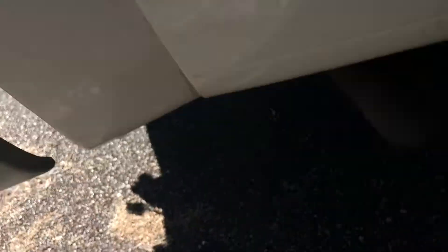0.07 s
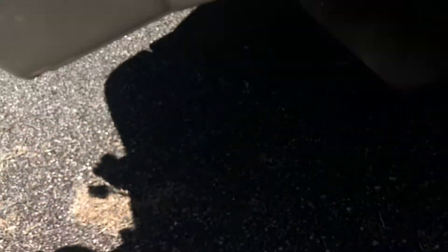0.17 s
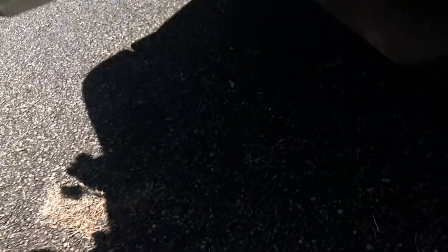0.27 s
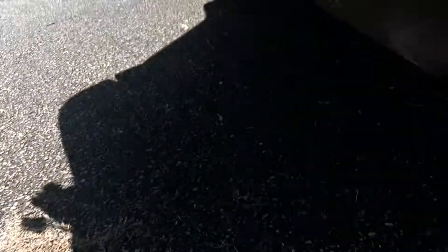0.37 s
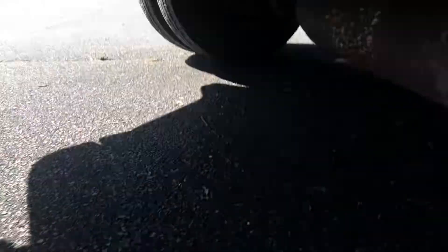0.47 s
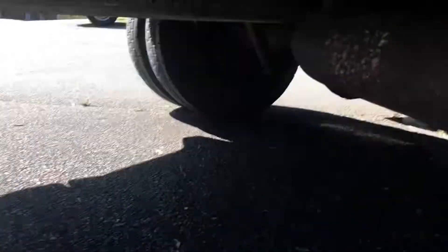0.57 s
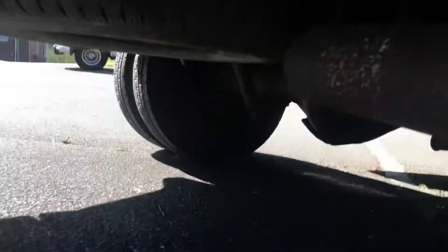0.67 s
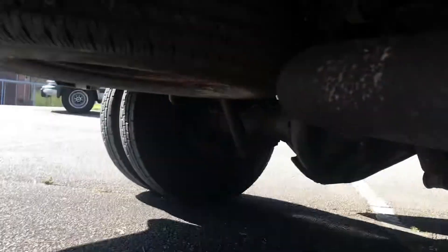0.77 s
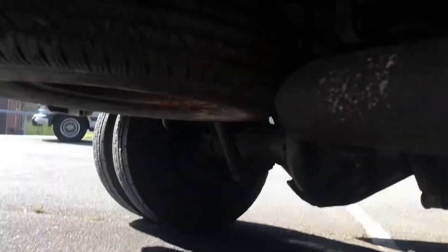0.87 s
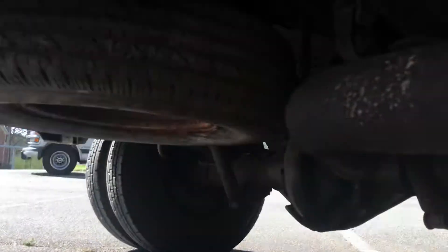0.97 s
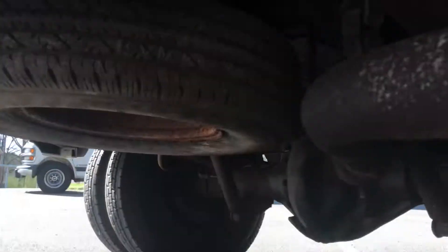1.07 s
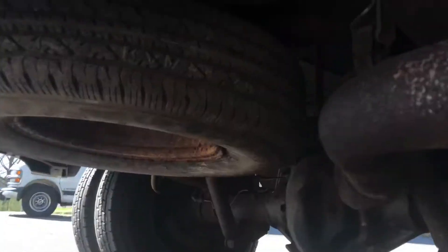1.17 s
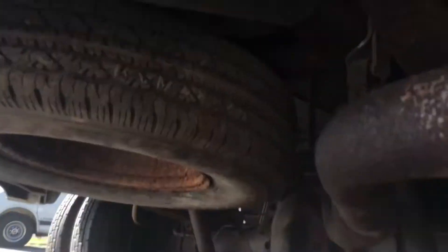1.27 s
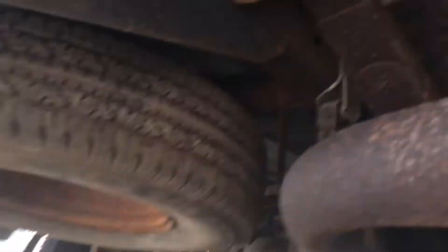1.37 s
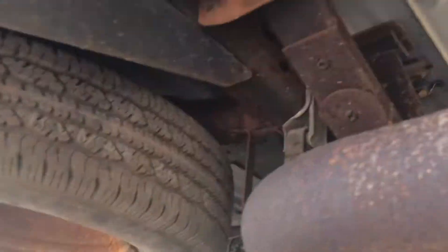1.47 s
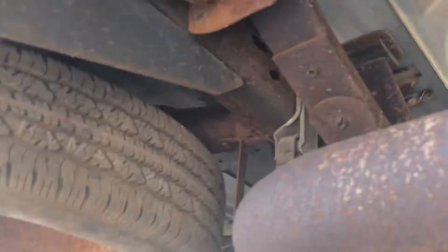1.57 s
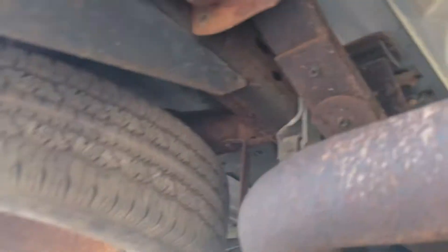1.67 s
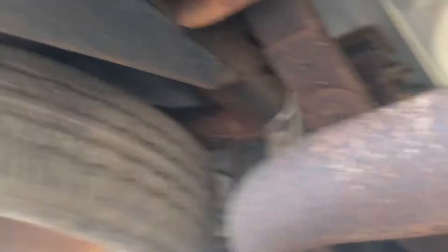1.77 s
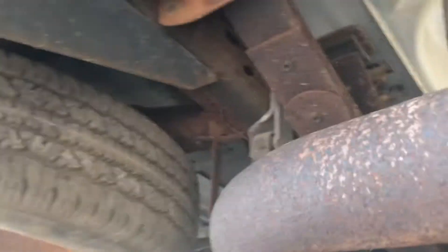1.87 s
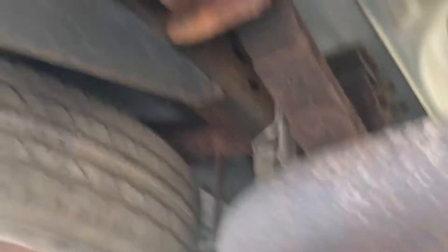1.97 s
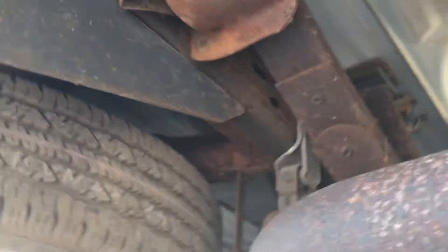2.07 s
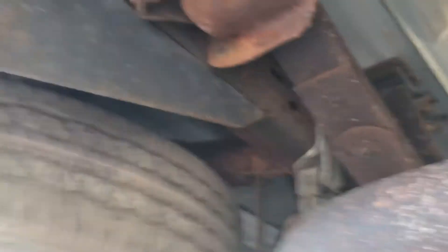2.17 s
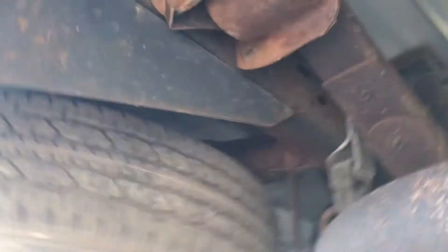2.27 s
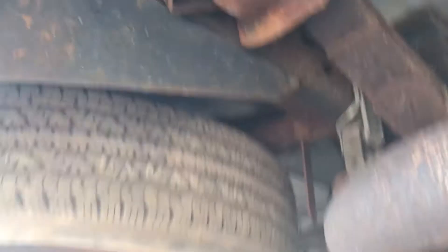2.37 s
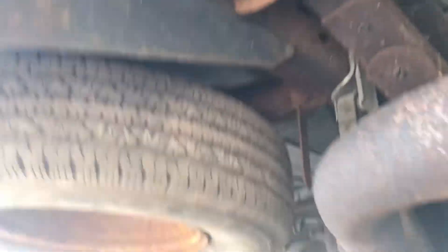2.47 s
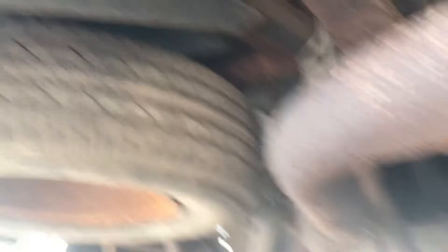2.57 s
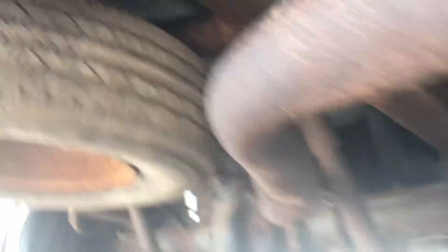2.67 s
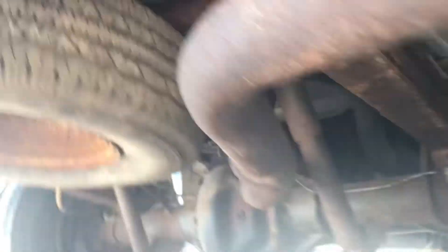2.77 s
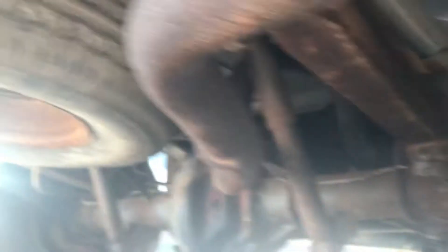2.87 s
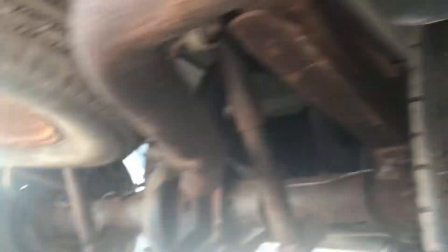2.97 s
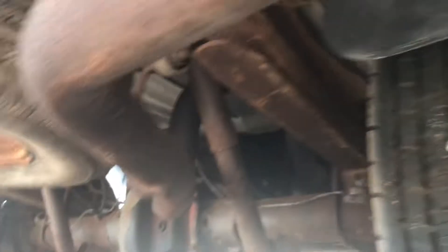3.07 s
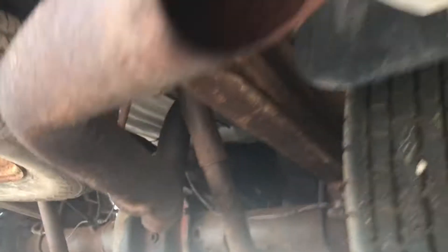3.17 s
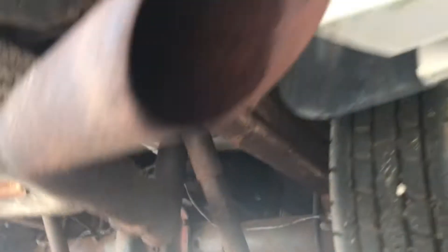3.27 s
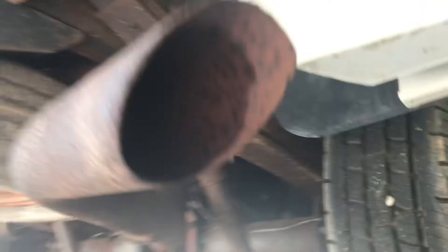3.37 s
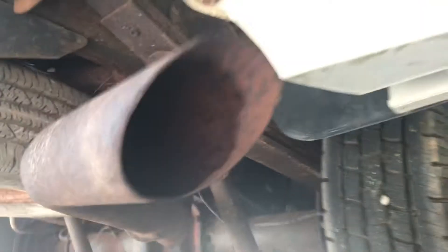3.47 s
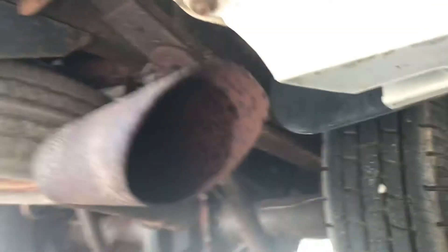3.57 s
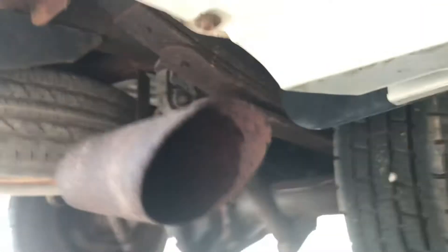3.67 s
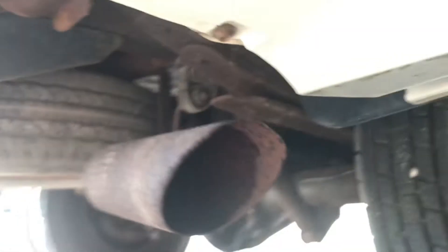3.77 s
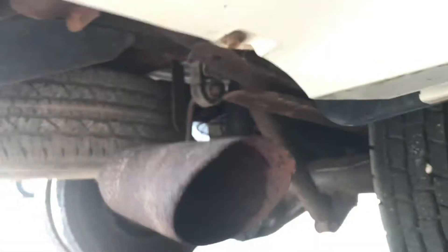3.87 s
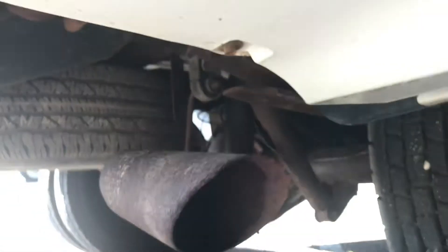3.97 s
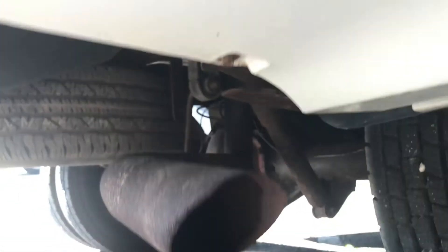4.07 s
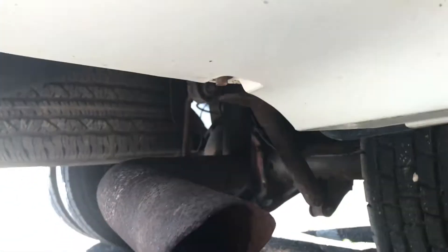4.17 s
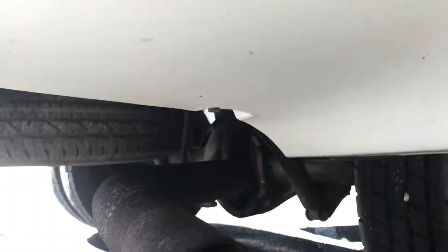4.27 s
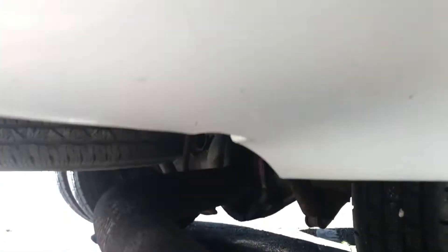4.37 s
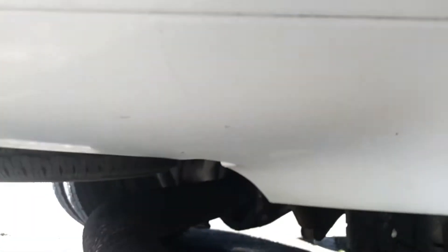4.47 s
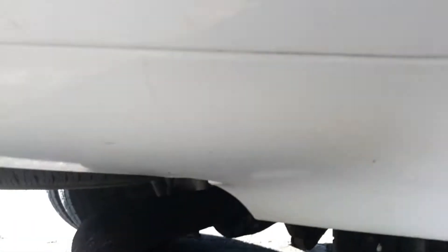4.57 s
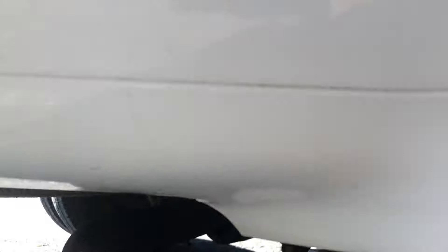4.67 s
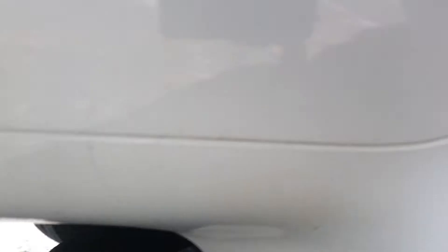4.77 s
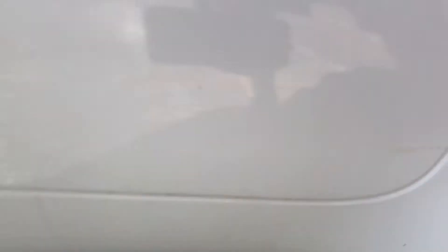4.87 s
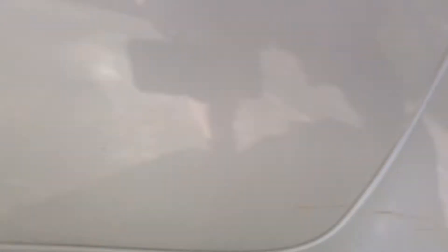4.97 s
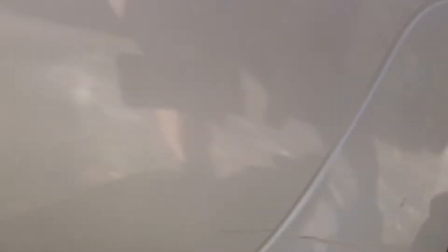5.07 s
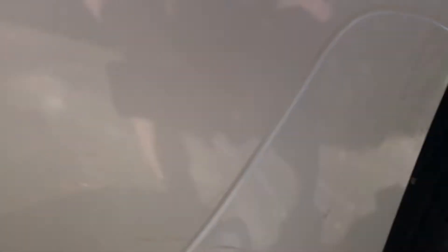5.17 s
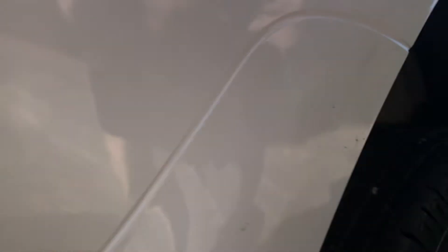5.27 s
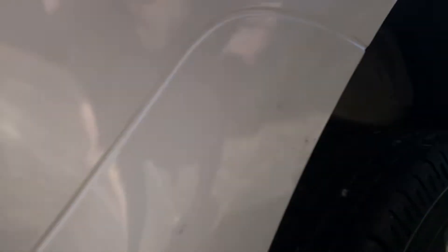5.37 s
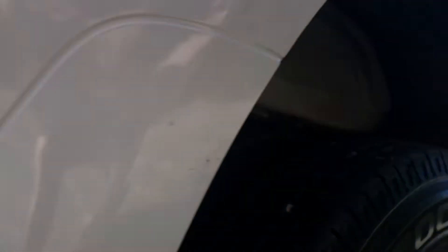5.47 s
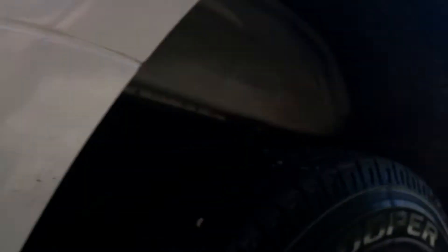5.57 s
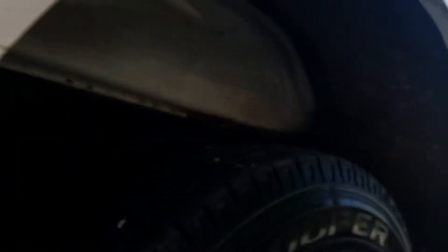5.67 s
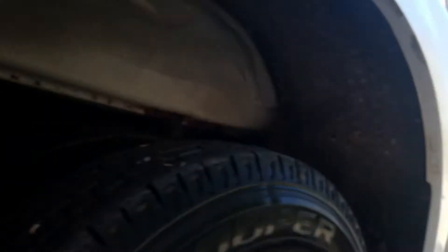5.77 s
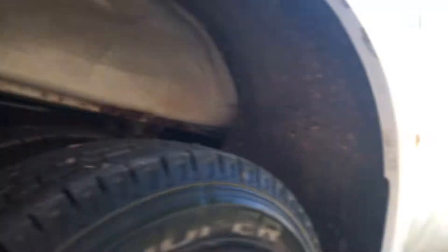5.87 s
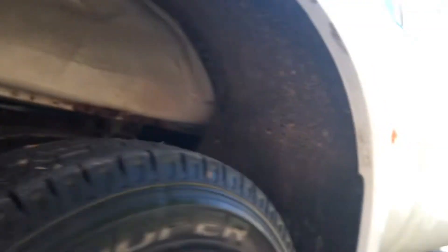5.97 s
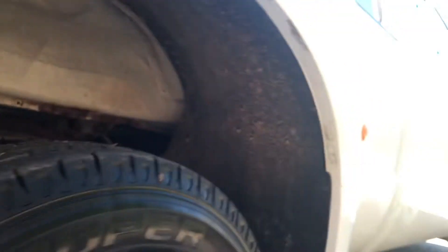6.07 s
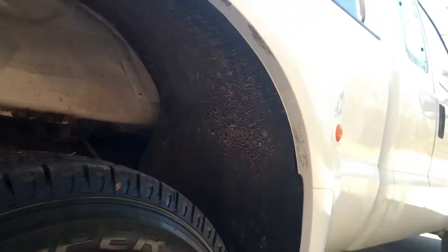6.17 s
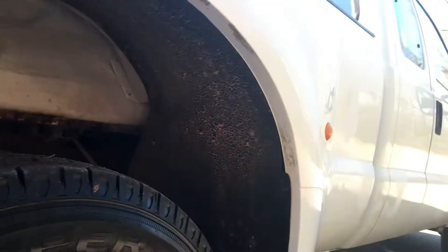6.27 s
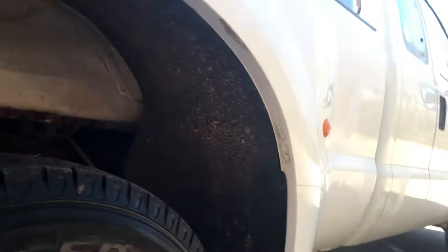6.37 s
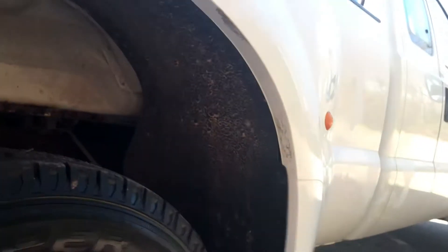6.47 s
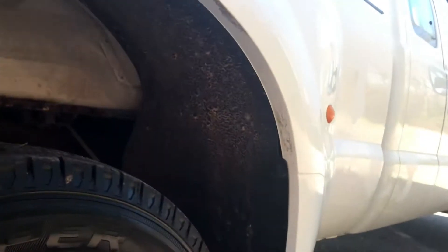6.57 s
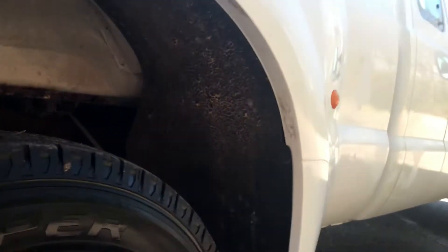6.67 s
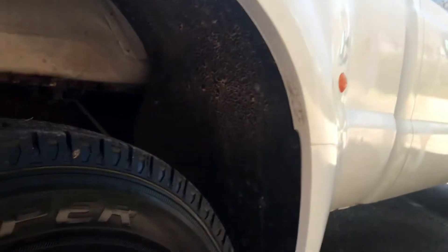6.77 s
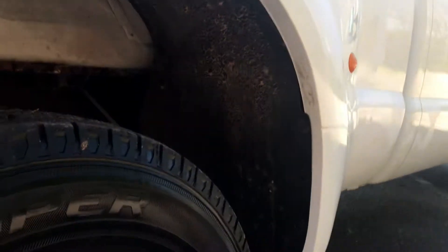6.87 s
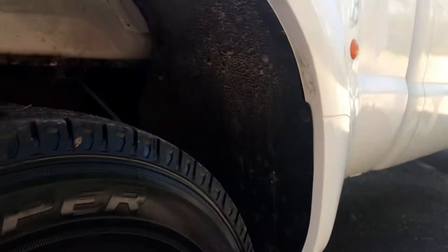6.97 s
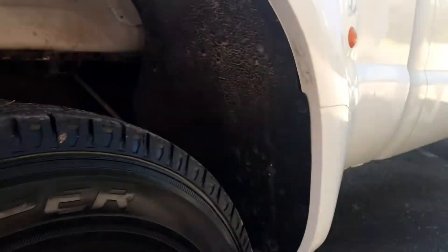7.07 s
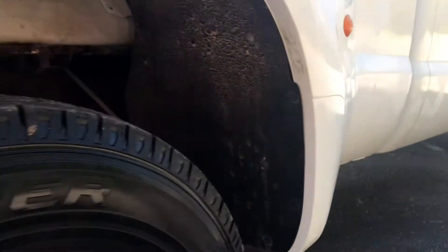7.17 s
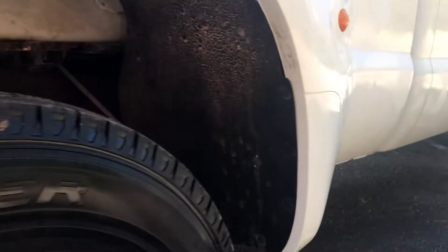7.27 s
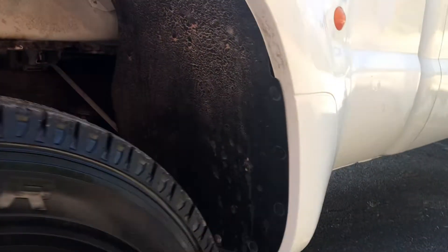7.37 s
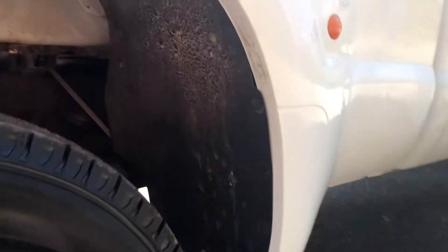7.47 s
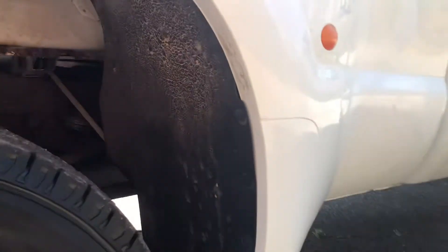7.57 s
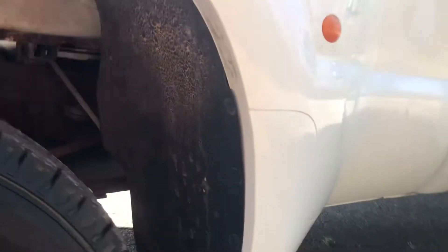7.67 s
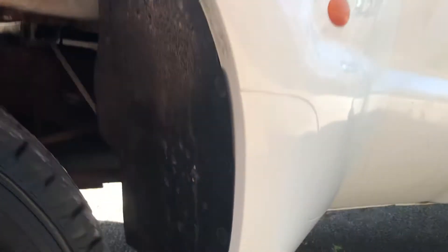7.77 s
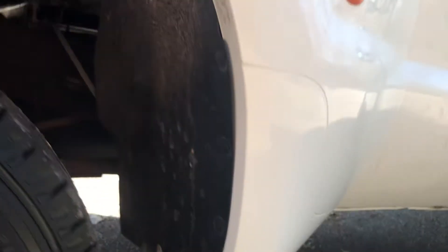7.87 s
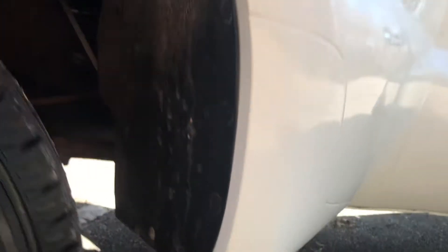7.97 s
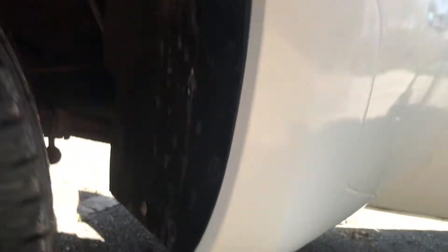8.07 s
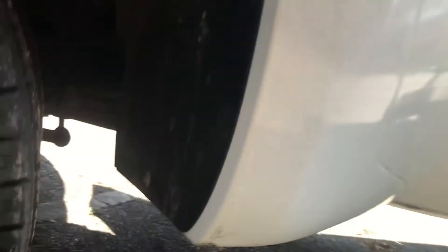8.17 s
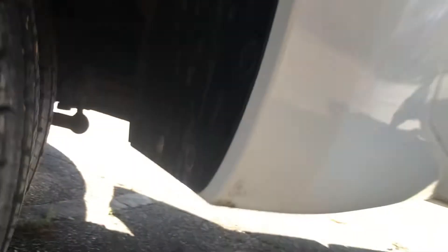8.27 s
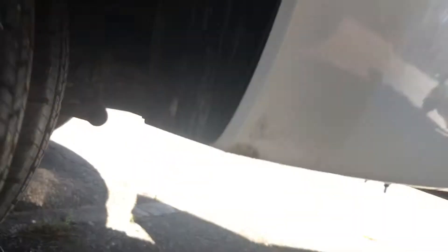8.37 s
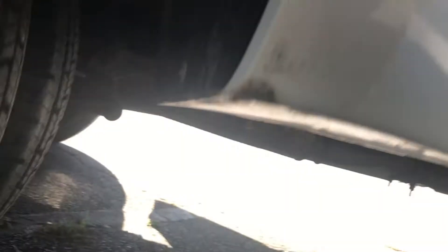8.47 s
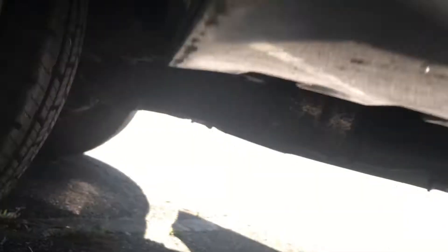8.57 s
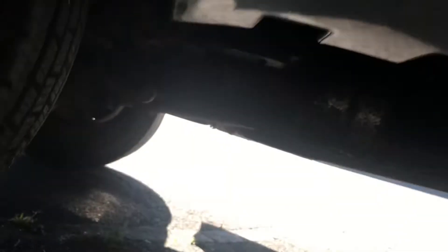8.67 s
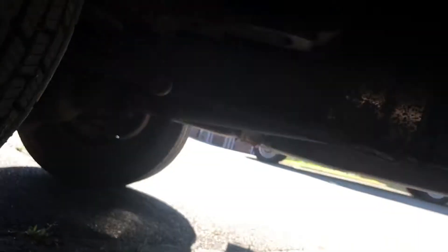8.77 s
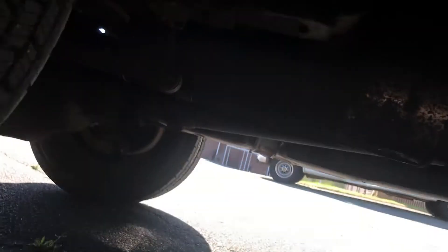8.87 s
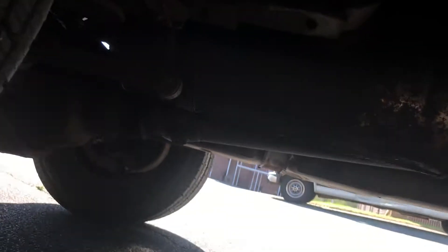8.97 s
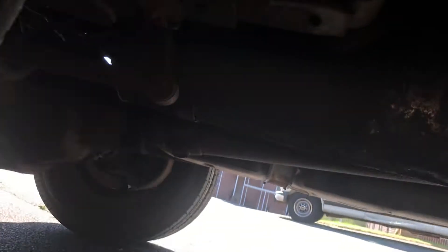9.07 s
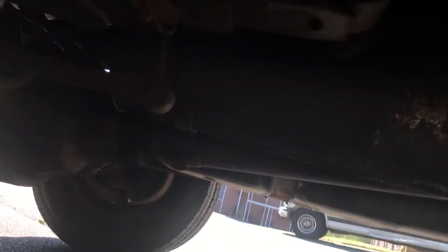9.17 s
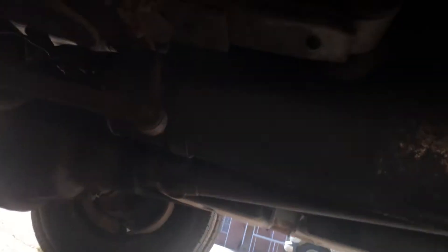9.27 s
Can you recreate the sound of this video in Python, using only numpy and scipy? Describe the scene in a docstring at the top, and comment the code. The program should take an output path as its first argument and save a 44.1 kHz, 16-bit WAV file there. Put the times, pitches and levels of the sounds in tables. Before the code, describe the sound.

Steady low idle of a large truck, heard close from a moving microphone on asphalt. The exhaust throbs unevenly, with occasional soft thumps, swelling near the pipe mouth and fading at the wheel arch. There, midrange mechanical clatter and fine valve hiss grow clearer. Light grit ticks come first, then a sharp shoe scrape with dull heel knocks halfway, sparse finger clicks, and finally a softer scuff with rapid ticks.

```python
"""A ten-cylinder petrol truck engine idles outdoors: its firing tone and octave are sines locked to the camshaft,
uneven burns ring the exhaust pipe modes, and shaped noise makes the gas rush, engine bay and valve hiss.
The microphone starts under the load bed, passes the tailpipe mouth and ends by the wheel arch and sill, where the
exhaust is fainter and the engine bay louder. Shoes scuff on gritty asphalt: enveloped grainy noise, with short
dying cracks for ticks and heel knocks."""
import sys
import numpy as np
from scipy import signal
from scipy.fft import rfft, irfft, next_fast_len
from scipy.io import wavfile
from scipy.ndimage import uniform_filter1d, map_coordinates

SR = 44100
rng = np.random.default_rng(int(sys.argv[2]) if len(sys.argv) > 2 else 0)


def unload_audio(sound):
    """Save the sound as a 16-bit wav file, at the path given as the first command line argument."""
    columns = np.transpose(np.atleast_2d(sound))
    # keep every value between -1 and 1, then stretch to whole-number steps
    steps = np.round(np.clip(columns, -1, 1) * 32767)
    wavfile.write(sys.argv[1], SR, steps.astype(np.int16))


def natural_amplitude(level_db):
    """Convert a level in decibels to a linear amplitude factor, elementwise."""
    exponent = np.asarray(level_db, float) / 20
    return 10 ** exponent


N = 411012  # samples

# microphone walk: time_s, place (0 under the bed, 1 tailpipe, 2 wheel arch, 3 low beside the sill),
# firing_tone_db, detour_m of the sound reflected by ground and body, engine_bay_db
WALK = [(0, -0.14, -27, 0.21, -52), (.35, 0.7, -26, 0.28, -52), (.8, 0.22, -24.5, .3, -50.5),
        (1.5, -0.07, -24, 0.24, -49.5), (2.4, 0, -24, 0.23, -50), (2.85, 0, -23, .2, -49.5),
        (3.2, 0.64, -21, 0.19, -50.5), (3.5, 1, -22, 0.42, -53), (3.9, 1, -22.5, .42, -54),
        (4.2, 1, -24.5, 0.59, -54), (4.75, 1, -25.5, .72, -54), (5.2, 1, -27.5, 0.52, -55),
        (5.6, 1.95, -30.5, 0.56, -52), (6.0, 2.5, -33, 0.48, -50.5), (6.6, 2, -33, 0.38, -48.5),
        (7.2, 2.5, -32.5, 0.46, -49), (7.6, 2.5, -34, 0.43, -47), (8.2, 3, -34, 0.16, -47),
        (8.8, 3, -33, 0.32, -46), (9.32, 3, -31, 0.23, -46)]
# exhaust against the firing tone, one row per place: octave_db, uneven_firings_db, third_mode_db, fourth_mode_db
EXHAUST_MIX = [(-14, -14.5, -27, -35.5), (-16, -14.5, -25, -30), (-12.5, -9, -22.5, -25.5),
               (-12, -8, -23.5, -25.5)]
# against the engine bay, one row per place: gas_rush_db, valve_gear_db
BAY_MIX = [(2.5, -16), (8.5, -14.5), (-0.5, -13.5), (2, -12.5)]
# low modes of the exhaust pipe: centre_hz, width_hz, relative_db
LOW_PIPE = [(59.7, 19.7, 1), (112, 24, -12), (153, 20, -8.5), (182, 26, -3.5), (200.8, 9.9, 1.5)]


def unit(x):
    """Scaled to rms 1."""
    return x / np.sqrt(np.mean(x ** 2) + 1e-20)


def curves(rows):
    """One value per sample for each column after the time."""
    time_s, *columns = np.transpose(rows)
    return [np.interp(np.arange(N) / SR, time_s, column) for column in columns]


def in_place(rows):
    """One value per sample for each column of a table with one row per place."""
    place = curves(WALK)[0]
    return [np.interp(place, np.arange(len(rows)), column) for column in np.transpose(rows)]


def wobble(rate_hz):
    """Smooth random curve of rms 1, rate_hz knots a second."""
    knots = rng.standard_normal(int(N * rate_hz / SR) + 4)
    return unit(map_coordinates(knots, [np.arange(N) * rate_hz / SR]))


def filtered(x, response):
    """x times a complex response of frequency."""
    m = next_fast_len(N + SR // 2)
    return irfft(rfft(x, m) * response(np.fft.rfftfreq(m, 1 / SR)), m)[..., :N]


def coloured(x, points):
    """x through (Hz, dB) points on a log frequency axis, rms 1."""
    f, db = np.transpose(points)
    return unit(filtered(x, lambda hz: natural_amplitude(np.interp(np.log(hz + 1), np.log(f + 1), db))))


def resonant(x, modes):
    """x through parallel second-order resonances (centre Hz, width Hz, dB)."""
    return filtered(x, lambda f: sum(natural_amplitude(db) * 1j * f * w / (c * c - f * f + 1j * f * w) for c, w, db in modes))


def dying_noise(samples, t60_s):
    """White noise that decays by 60 dB in t60_s."""
    return natural_amplitude(-60 * np.arange(samples) / SR / t60_s) * rng.standard_normal(samples)


def with_tail(x, t60_s, tail_db):
    """x plus a dense dying tail of itself."""
    tail = dying_noise(SR // 10, t60_s)
    return x + natural_amplitude(tail_db) * signal.fftconvolve(x, tail / np.linalg.norm(tail))[:N]


def reflection_db(hz):
    """Direct and reflected sound add or cancel, by the detour in wavelengths."""
    reflected, sound_m_per_s = 0.73, 343  # reflected amplitude against the direct sound
    turn = 2 * np.pi * hz * curves(WALK)[2] / sound_m_per_s
    return 10 * np.log10(1 + reflected ** 2 + 2 * reflected * np.cos(turn) + 1e-3)


def spells():
    """The idle pulls harder or falters: each spell is a smooth bump in the three exhaust levels."""
    # centre_s, half_length_s, firing_tone_db, uneven_firings_db, upper_modes_db
    spell_rows = [(0.196, 0.094, -3.5, 3.5, -4), (0.503, 0.15, -1, -3, 7), (0.702, 0.087, 4.5, 5, 6.5),
                  (0.827, 0.12, -0.5, 6, -5), (1.053, 0.1, 1.5, -5, -6), (1.323, 0.063, 3.5, 4.5, 2),
                  (1.55, 0.087, -3, 5, 3.5), (1.76, .12, 1, 1, 3.5), (1.9, 0.09, -2, 5, 2),
                  (2.078, 0.13, 2, -4, -4), (2.205, 0.2, -2, 2.5, 1.5), (2.53, 0.048, -4.5, 2, 4),
                  (2.666, 0.15, 0.5, 1, -1.5), (2.99, 0.084, -3, 5.5, 5), (3.12, 0.18, 2, 4.5, 3.5),
                  (3.346, 0.19, -2, 4, 6.5), (3.64, 0.15, 1.5, 0.5, 8.5), (4.09, 0.18, -0.5, 6.5, 3.5),
                  (4.264, 0.13, -1, 8.5, 11), (4.55, 0.19, -2, 8.5, 4), (4.97, 0.16, -1.5, 6, 0),
                  (5.1, 0.14, 0, 0, 7), (5.352, .1, -1, 2, -3), (5.55, 0.24, 0.5, -7.5, -11),
                  (5.99, 0.15, -0.5, -2, -10), (6.196, .1, 2, -1, 4), (6.544, 0.11, -7, 3, -1.5),
                  (7.205, 0.44, -0.5, 3.5, 6), (7.7, 0.23, -1.5, 3, 3), (7.93, 0.089, -0.5, 1, 2),
                  (8.11, .14, -0.5, 8, 5), (8.413, 0.2, 0.5, -9, 0.5), (8.658, .08, -0.5, -3, 1),
                  (8.988, 0.17, 0, -6.5, -2.5), (9.2, .12, -1.5, -1.5, -8)]
    t, out = np.arange(N) / SR, np.zeros((3, N))
    for centre_s, half_length_s, *db in spell_rows:
        bump = np.cos(np.pi / 2 * np.clip((t - centre_s) / half_length_s, -1, 1)) ** 2
        out += np.outer(db, bump)
    return out


def by_place(spectra, patchy_db, echo_db, rattle_db):
    """Patchy noise; each place has its own colour, ringing panels and echoes between chassis and ground."""
    # pipe and panels that ring most, one list per place: centre_hz, width_hz, relative_db
    panels = [
        [(598, 28, -2), (711, 12, 6), (815, 20, -10), (848, 22, 2.5), (929, 20, -2.5), (1060, 19, -4.5),
         (1570, 12, -1), (2300, 30, -4.5), (2490, 21, 0.5), (2570, 30, -7)],
        [(604, 14, -0.5), (690, 20, -0.5), (822, 20, 3.5), (850, 11, -0.5), (1222, 66, -0.5), (1450, 30, -14),
         (1670, 25, -4), (2000, 25, -6), (2423, 30, -1.5)],
        [(600, 23, -8), (654, 27, -4), (820, 15, -5), (1544, 13, 6), (1750, 20, -15), (2040, 21, -5),
         (2500, 27, -4)],
        [(555, 20, -22), (689, 38, 4), (850, 43, -6), (1546, 22, 2), (1980, 18, -10)],
    ]
    rattle = rng.standard_normal(N) * natural_amplitude(rattle_db * wobble(700))
    z = signal.stft(rattle, nperseg=1024)[2]
    field = uniform_filter1d(rng.standard_normal(z.shape), size=3, axis=0)  # across frequency
    field = uniform_filter1d(field, size=14, axis=1)  # along time
    noise = signal.istft(z * natural_amplitude(patchy_db * unit(field)), nperseg=1024)[1][:N]
    place, out = curves(WALK)[0], 0
    for k, spectrum in enumerate(spectra):
        near = with_tail(noise, 0.15, echo_db)
        share = np.clip(1 - abs(place - k), 0, 1)
        out = out + share * coloured(near + resonant(near, panels[k]), spectrum)
    return out


def camshaft():
    """Camshaft turns: ten firings make one."""
    # time_s, firing_rate_hz
    speed = [(0, 64.3), (.45, 63.1), (.9, 62), (1.5, 63.4), (2.4, 63.5), (3.3, 62.9), (3.6, 60.8),
             (3.9, 60.7), (4.2, 62), (5.1, 62.5), (6.0, 62.55), (6.3, 63.4), (7.5, 62.5), (9.0, 62.7),
             (9.32, 63.8)]
    return np.cumsum(curves(speed)[0]) / SR / 10


def tones(cam):
    """The firing tone and its octave, with weaker tones of unequal cylinders and belt-driven parts."""
    # camshaft_multiple, near_db against the octave near the exhaust, far_db the same at the wheel arch
    weak_orders = [(5.3, -5, -19), (15.2, -7.5, -5), (17.26, -8, -11.5), (18.44, -12, -1.5),
                   (22.06, -7.5, -8.5), (22.86, -12, -14), (24.98, -13.5, -6.5), (30.37, -13.5, -10.5),
                   (33.04, -10.5, -12.5), (40.4, -22.5, -22), (46.95, -28, -24), (49, -31.5, -22.5),
                   (50.1, -23, -25)]
    place, walk_db = curves(WALK)[:2]
    first_db = walk_db + spells()[0] + 0.15 * wobble(8) + 0.13 * wobble(25)
    second_db = walk_db + in_place(EXHAUST_MIX)[0] + 0.5 * reflection_db(99)
    far = np.clip(place - 1, 0, 1)
    # out from under the bed the octave lags more, and the wave leans the other way
    lag_rad = 1.0 + 1.3 * np.clip(place, 0, 1) - 0.45 * wobble(14)
    out = natural_amplitude(first_db) * np.sin(2 * np.pi * 10 * cam)
    out += natural_amplitude(second_db + 0.93 * wobble(15)) * np.sin(2 * np.pi * 20 * cam - lag_rad)
    for multiple, near_db, far_db in weak_orders:
        drift_rad = rng.uniform(0, 2 * np.pi) + 0.4 * wobble(3)
        order_db = second_db + near_db + far * (far_db - near_db) + 0.87 * wobble(3.6)
        out += natural_amplitude(order_db) * np.sin(2 * np.pi * multiple * cam + drift_rad)
    return np.sqrt(2) * out  # levels are rms


def silenced(x):
    """The silencer cuts steeply above the low pipe modes."""
    return filtered(x, lambda hz: 1 / (1 + (hz / 224) ** 14))


def uneven_burns(cam):
    """No two burns are alike: the differences, as jittered signed impulses, ring the pipe modes."""
    # how unevenly each cylinder burns: level_db
    cylinders = [5, 1.5, 2, -6, -1.5, 2, 5, 4.5, -1, 2]
    third, fourth = (305, 17, 0), (407, 30, 0)  # pipe modes: centre Hz, width Hz, dB
    walk_db, (_, rough_db, ring_db) = curves(WALK)[1], spells()
    low_db, third_db, fourth_db = walk_db + np.array(in_place(EXHAUST_MIX)[1:])
    low_db += rough_db + 0.8 * wobble(14)
    third_db += ring_db + reflection_db(third[0])
    fourth_db += 0.47 * ring_db + reflection_db(fourth[0])

    fired = np.flatnonzero(np.diff(np.floor(10 * cam)))
    jitter, sign, spread = rng.standard_normal((3, len(fired)))
    cylinder = (10 * cam[fired + 1]).astype(int) % len(cylinders)
    uneven_db = 2.8 * spread + np.take(cylinders, cylinder)
    at = np.clip(fired + (0.002 * SR * jitter).astype(int), 0, N - 1)
    burns = np.zeros(N)
    burns[at] = np.sign(sign) * natural_amplitude(uneven_db)
    burns = unit(burns) + 0.36 * rng.standard_normal(N)  # steady turbulence under the firings

    def sharp(mode):
        return unit(resonant(resonant(burns, [mode]), [mode]))

    low = natural_amplitude(low_db) * unit(silenced(resonant(burns, LOW_PIPE)))
    return low + natural_amplitude(third_db) * sharp(third) + natural_amplitude(fourth_db) * sharp(fourth)


def gas_rush():
    """Gas rushing in the pipe: noise coloured by place, its level wavering."""
    # one list per place: freq_hz, relative_db_per_hz
    rush_spectra = [
        [(190, -37), (265, -7), (330, -5.5), (355, -2.5), (408, -4), (461, -7.5), (592, -2), (644, -4.5),
         (708, -3.5), (761, -3), (842, -3.5), (1030, -7.5), (1110, -23.5), (1250, -15.5), (1620, -41),
         (2750, -120)],
        [(190, -40.5), (265, -8), (330, -8.5), (355, -6.5), (408, -11), (451, -11), (496, 1), (554, -4.5),
         (606, 3.5), (677, -4), (749, -6.5), (828, -4.5), (1060, -15.5), (1250, -21.5), (1620, -47.5),
         (2750, -120)],
        [(190, -44), (265, -4), (330, -8), (339, -4.5), (456, -11), (493, -6.5), (567, 2), (619, -4),
         (692, -6.5), (823, -7.5), (1170, -11.5), (1250, -6), (1620, -47), (2750, -120)],
        [(190, -22), (265, 1.5), (330, 0), (415, -13), (448, -2.5), (542, 0), (613, 2), (670, -3), (778, -3),
         (851, -3), (1090, -17), (1250, -15), (1620, -35), (2750, -120)],
    ]
    rush_db = curves(WALK)[3] + in_place(BAY_MIX)[0] + 0.27 * wobble(3) + 0.73 * wobble(20)
    return natural_amplitude(rush_db) * by_place(rush_spectra, patchy_db=0.5, echo_db=-11.0, rattle_db=1.5)


def valve_swell_db(cam):
    """Level swells at fixed points of each camshaft turn."""
    # turn_share, swell_db
    chuffs = [(.86, 3), (.145, 5.5), (.3, 1.5)]
    return sum(db * np.exp(25 * (np.cos(2 * np.pi * (cam - at)) - 1)) for at, db in chuffs)


def engine_bay(swell_db):
    """Clatter in the bay: noise coloured by place, following the valve swells slightly."""
    # one list per place: freq_hz, relative_db_per_hz
    bay_spectra = [
        [(620, -20.5), (1050, -4), (1110, -7), (1360, -4.5), (1470, -8.5), (1590, -10), (1750, -13.5),
         (2000, -10.5), (2390, -15.5), (2520, -13), (3310, -20), (4000, -23), (5000, -31.5), (6500, -58),
         (11000, -120)],
        [(620, -32.5), (1050, -14), (1380, -5.5), (1490, -1.5), (1610, -9.5), (1950, -10), (2170, -13),
         (2330, -12.5), (2670, -11.5), (3100, -16.5), (3900, -22), (4360, -24.5), (5000, -35.5), (6500, -69),
         (11000, -120)],
        [(620, -30), (1050, -10), (1180, -10.5), (1270, -3.5), (1360, -3), (1540, -1.5), (1910, -10),
         (2470, -10), (3080, -15.5), (3930, -18.5), (5000, -26), (6500, -59), (11000, -120)],
        [(620, -18), (1050, -5), (1100, -17), (1170, -2.5), (1350, -4.5), (1540, -2), (1770, -6), (2930, -9),
         (3610, -15), (4030, -16), (5000, -28.5), (6500, -51), (11000, -120)],
    ]
    bay_db = curves(WALK)[3] + 0.2 * swell_db + 0.25 * wobble(30)
    return natural_amplitude(bay_db) * by_place(bay_spectra, patchy_db=1.5, echo_db=-9, rattle_db=1.0)


def valve_hiss(swell_db):
    """Valve gear: noise ringing in many small metal modes; only its upper band swells."""
    # freq_hz, relative_db_per_hz
    valve_spectrum = [(2350, -25), (4000, -4), (4950, -10), (5500, -8), (6800, -7.5), (7500, -12.5),
                      (8300, -12), (9600, -17.5), (10500, -22), (11500, -19), (13500, -22.5),
                      (15600, -23.5)]
    valve_db = curves(WALK)[3] + in_place(BAY_MIX)[1] + 0.4 * wobble(25)
    valves = coloured(with_tail(rng.standard_normal(N), 0.14, -8.5), valve_spectrum)
    upper = filtered(valves, lambda hz: 1 / (1 + (6000 / (hz + 1)) ** 6) / (1 + (hz / 10500) ** 8))
    return natural_amplitude(valve_db) * (valves + (natural_amplitude(swell_db) - 1) * upper)


def scuffs():
    """Grit crackles under the sole, the finest grains first, while the sole itself rasps lower down."""
    # peak_s, rise_s, fall_s, grit_db, sole_db against the grit
    scuff_rows = [(.172, .014, 0.022, -61, -25), (.195, 0.069, 0.12, -56, 8.5),
                  (4.272, 0.032, 0.043, -49, 2), (4.305, .02, 0.022, -54, 2.5),
                  (4.39, 0.033, 0.043, -38, -3), (4.424, .04, 0.088, -54, 5),
                  (4.588, 0.036, 0.031, -58.5, 7), (4.618, 0.011, 0.055, -60.5, -7),
                  (4.72, 0.049, .04, -53, 1.5), (4.756, .03, 0.022, -51.5, 0.5),
                  (5.085, 0.018, 0.045, -59.5, -21), (5.113, .04, 0.055, -52.5, -3.5),
                  (5.174, .02, 0.035, -61, 2), (6.01, .02, .04, -64.5, -12), (6.08, .05, 0.16, -61.5, -12),
                  (6.294, .04, .04, -63, 3), (6.39, 0.087, .08, -60, 9), (7.965, 0.1, 0.14, -51, 9.5),
                  (8.476, 0.038, 0.1, -58.5, 3), (8.535, 0.058, .08, -66, -31), (8.65, .1, .06, -61, 8)]
    # spectra of grit, sole and finest grit: freq_hz, relative_db_per_hz
    grit_spectrum = [(1500, -30), (3000, 3), (4300, 2.5), (5900, 1), (7500, -5), (9500, -6), (13000, -47)]
    sole_spectrum = [(350, -50), (700, -18), (1000, 2), (1400, 0.5), (1900, -4), (2450, -2.5), (3000, -8),
                     (3800, -8), (6000, -46.5)]
    fine_spectrum = [(6000, -39), (9000, -2.5), (11500, 1.5), (15600, -2.5)]
    range_db, roundness = 21.5, 1.62  # how far under its peak a scuff starts and ends; how flat its top is
    fine_db, fine_lead_s, sole_lag_s = -13, 0.006, 0.0027  # finest grit against the grit
    fine_for_sole = 0.55  # the lighter the sole, the more of the finest grit: dB per dB
    t, levels = np.arange(N) / SR, np.zeros((3, N))
    for peak_s, rise_s, fall_s, grit_db, sole_db in scuff_rows:
        layers = [(peak_s, grit_db),
                  (peak_s + sole_lag_s, grit_db + sole_db),
                  (peak_s - fine_lead_s, grit_db + fine_db - fine_for_sole * sole_db)]
        for k, (at_s, layer_db) in enumerate(layers):
            away = np.clip(np.maximum((at_s - t) / rise_s, (t - at_s) / fall_s), 0, 1)
            levels[k] += natural_amplitude(layer_db) * (natural_amplitude(-range_db * away ** roundness) - natural_amplitude(-range_db))
    out = 0
    for envelope, spectrum in zip(levels, (grit_spectrum, sole_spectrum, fine_spectrum)):
        grains = rng.standard_normal(N) * natural_amplitude(2.65 * wobble(500))
        out = out + envelope * coloured(grains, spectrum)
    return out


def ticks():
    """Ticks of grit and fingers, and heel knocks: short dying cracks, each around its own pitch."""
    # start_s, peak_db, centre_hz, t60_s
    tick_rows = [(.158, -47, 4300, .012), (.184, -34, 1300, 0.033), (.198, -49, 3800, 0.037),
                 (.214, -44, 5500, .012), (.237, -50, 5200, 0.0087), (.265, -51, 4970, .012),
                 (.282, -43, 4500, .01), (.393, -56, 7000, .011), (2.631, -51, 5700, .028),
                 (2.654, -39, 4020, 0.053), (3.39, -45.5, 4400, 0.067), (4.528, -55, 11500, .012),
                 (4.535, -43, 12000, 0.0061), (4.557, -44, 5000, .011), (4.584, -45, 5800, .015),
                 (4.592, -54, 6000, .01), (4.615, -53, 6500, .016), (4.75, -35.5, 5370, .025),
                 (4.814, -46, 5500, .014), (4.873, -48.5, 7500, 0.024), (4.913, -33.5, 2650, .014),
                 (5.068, -56, 10000, .03), (5.162, -52, 7000, .012), (5.174, -54, 4500, .012),
                 (5.778, -53, 9000, .014), (5.914, -39.5, 4600, 0.029), (6.52, -50, 9000, .014),
                 (6.5796, -38.5, 6300, 0.0093), (6.5809, -32, 2600, .01), (7.27, -37, 1700, .008),
                 (7.799, -38.5, 6460, .008), (7.945, -30, 2800, .015), (7.961, -30, 3060, 0.017),
                 (7.997, -31, 2000, .015), (8.012, -44, 7000, .014), (8.025, -49, 11000, .012),
                 (8.037, -30.5, 2800, 0.024), (8.058, -59, 12000, .012), (8.108, -41, 4500, .012),
                 (8.396, -35, 2300, .011)]
    # a heel knocks from the peak of the loudest scuff onward: start_s, peak_db, centre_hz, t60_s
    knock_rows = [(4.388, -32, 2330, 0.097), (4.402, -30, 2460, 0.13), (4.409, -25, 890, 0.054),
                  (4.419, -34.5, 850, 0.041)]
    tick_width, knock_width_hz = 0.76, 450  # tick width is over its centre
    snap_db, snap_t60_s = -17.5, 0.0097  # bright first contact
    samples, out = 4096, np.zeros(N + SR)
    hz = np.fft.rfftfreq(samples, 1 / SR)
    rows = [(*row, tick_width * row[2]) for row in tick_rows]
    rows += [(*row, knock_width_hz) for row in knock_rows]
    for start_s, peak_db, centre_hz, t60_s, width_hz in rows:
        band = 1j * hz * width_hz / (centre_hz ** 2 - hz ** 2 + 1j * hz * width_hz)
        response = band ** 2 / (1 + 1j * hz / centre_hz)  # duller towards the top
        crack = irfft(rfft(dying_noise(samples, t60_s)) * response)
        snap = np.diff(dying_noise(samples, snap_t60_s), prepend=0)
        crack = crack / abs(crack).max() + natural_amplitude(snap_db) * snap / abs(snap).max()
        out[round(start_s * SR):][:samples] += natural_amplitude(peak_db) * crack / abs(crack).max()
    return out[:N]


def thumps():
    """A few uneven burns thump: negative impulses ring the low pipe modes behind the silencer."""
    # start_s, strength_db
    pops = [(0.465, -30), (0.574, -36), (0.646, -14.5), (1.066, -33), (1.261, -22), (1.364, -27),
            (1.429, -23), (1.898, -26), (2.659, -24), (2.846, -34), (2.913, -34), (3.096, -22),
            (3.326, -32), (3.514, -30), (3.579, -32), (4.069, -18.5), (4.23, -27), (5.034, -23),
            (5.337, -20), (5.522, -36), (6.862, -34), (6.948, -38), (7.745, -31), (8.456, -42)]
    impulses = np.zeros(N)
    for start_s, strength_db in pops:
        impulses[round(start_s * SR)] = -natural_amplitude(strength_db + 42.5)  # makes up for the loss in the narrow modes
    return silenced(resonant(impulses, LOW_PIPE))


def scene():
    """All sources at the one microphone."""
    cam = camshaft()
    swell_db = valve_swell_db(cam)
    exhaust = tones(cam) + uneven_burns(cam) + thumps() + gas_rush()
    engine = engine_bay(swell_db) + valve_hiss(swell_db)
    return (exhaust + engine + scuffs() + ticks())[None]


def band_limit(x):
    """A steep low-pass at the top of the band."""
    return signal.sosfilt(signal.butter(12, 15700, fs=SR, output="sos"), x)


def record(dry):
    """The microphone cuts the deepest bass, below about 30 Hz."""
    mix = filtered(dry, lambda hz: 1 / (1 + (30 / (hz + 0.1)) ** 8))
    return band_limit(mix)


dry = scene()
out = record(dry)
unload_audio(out)
```